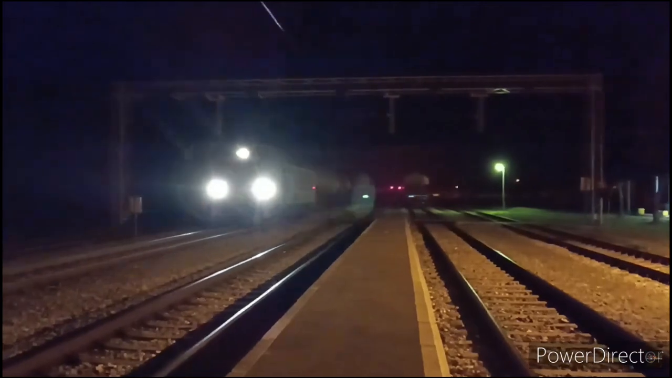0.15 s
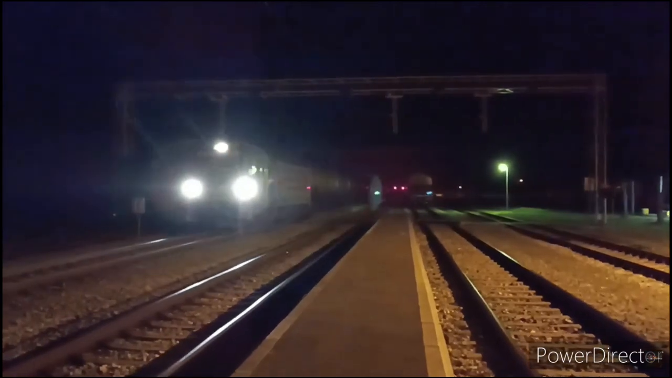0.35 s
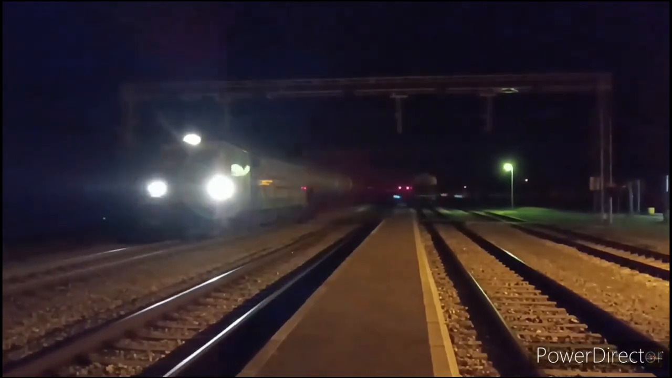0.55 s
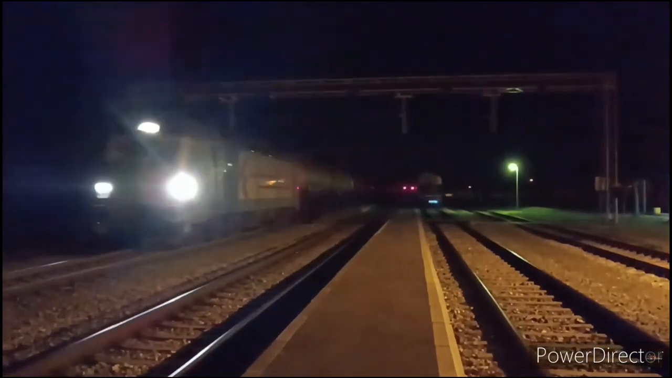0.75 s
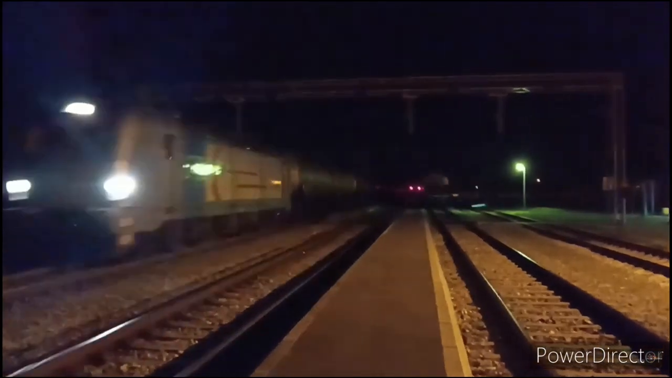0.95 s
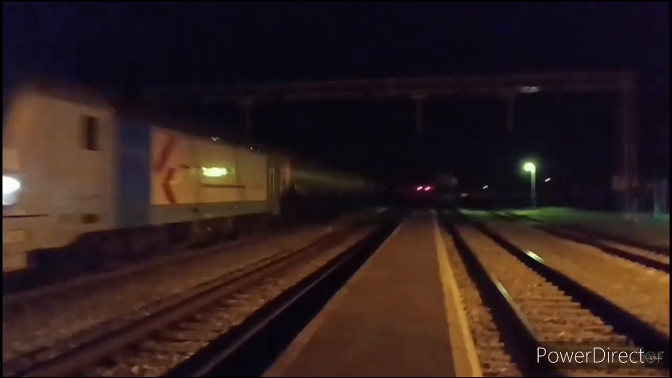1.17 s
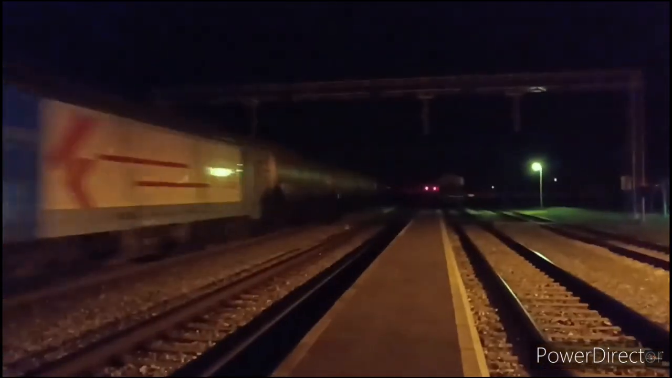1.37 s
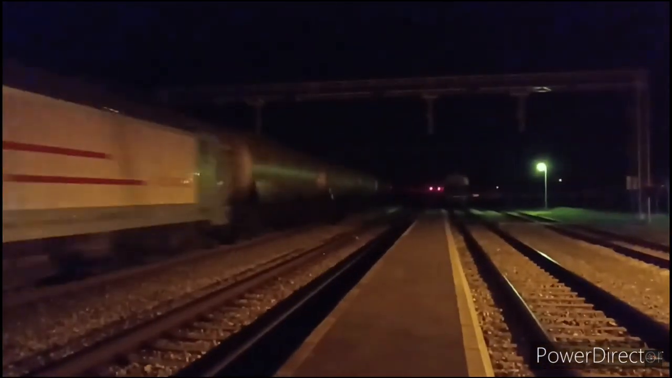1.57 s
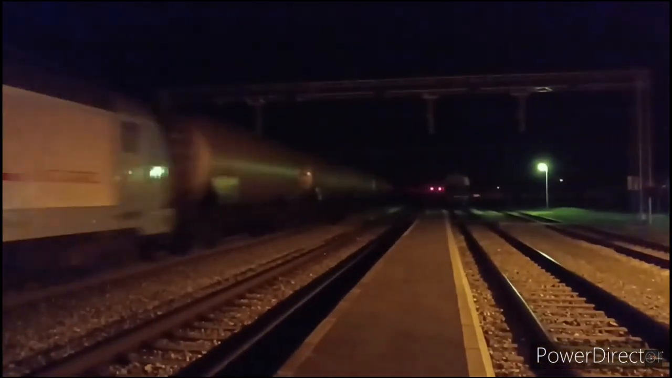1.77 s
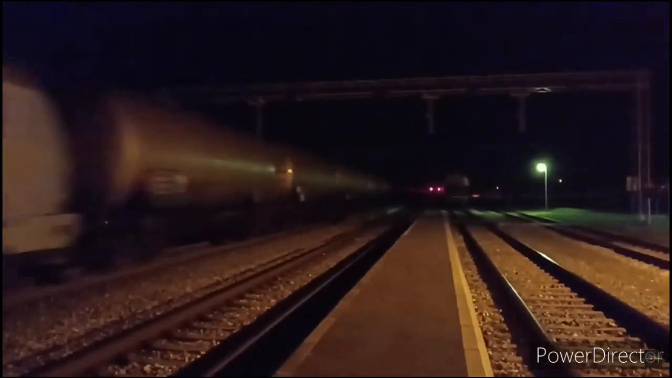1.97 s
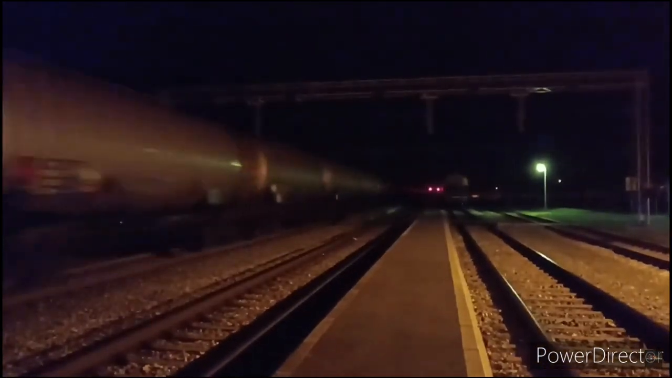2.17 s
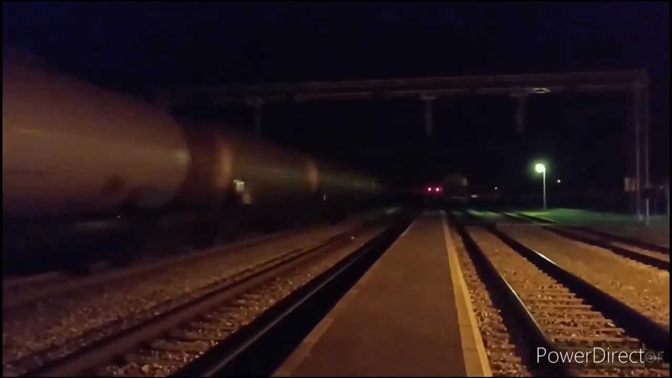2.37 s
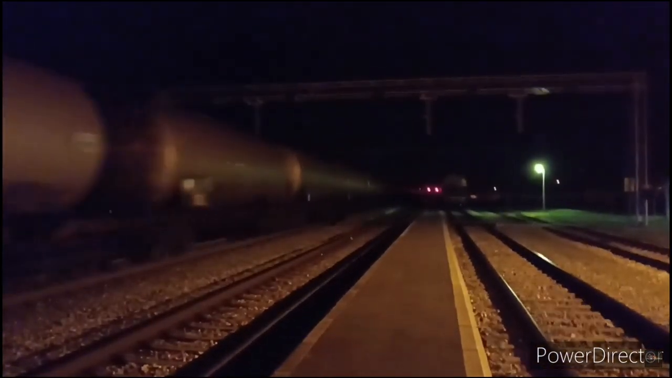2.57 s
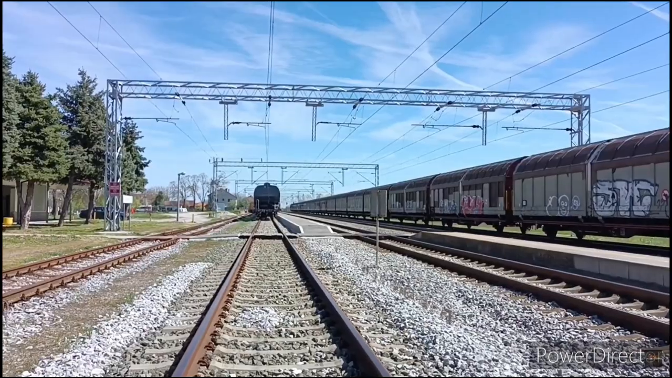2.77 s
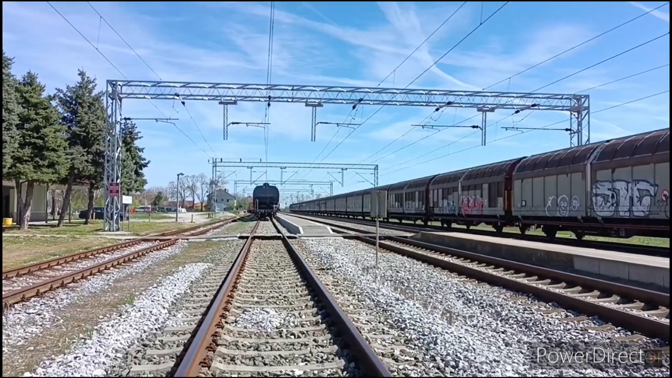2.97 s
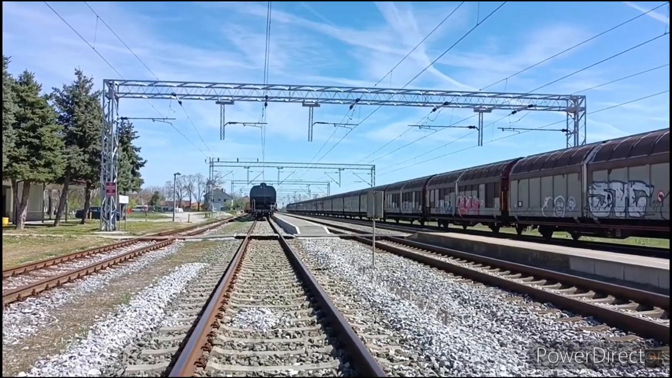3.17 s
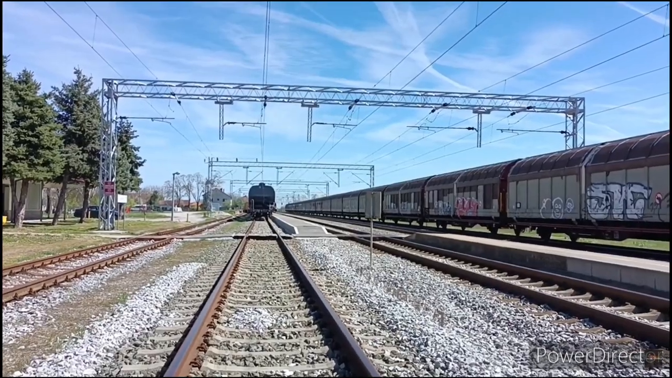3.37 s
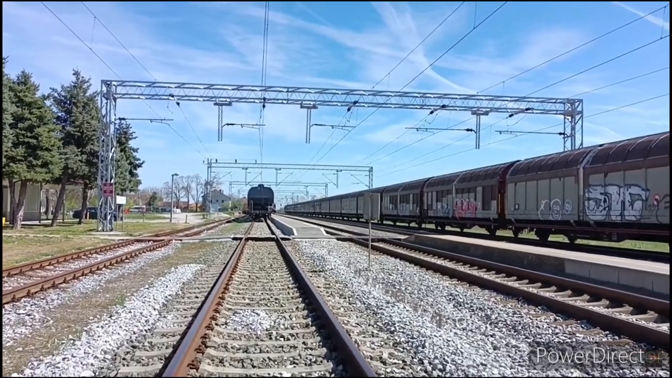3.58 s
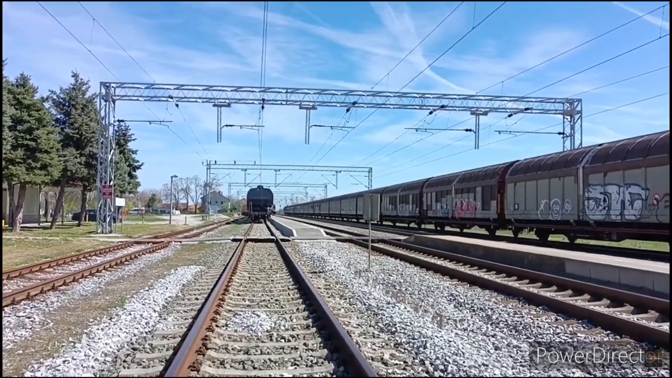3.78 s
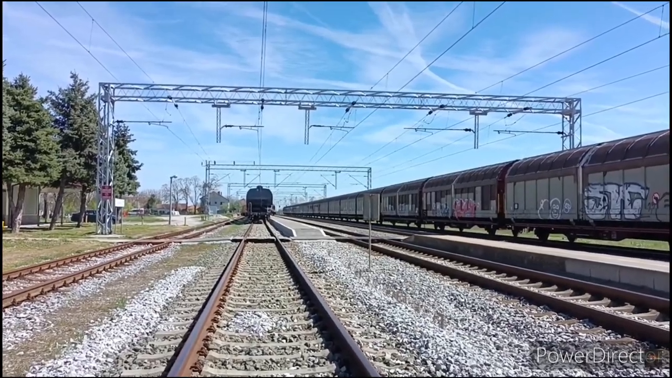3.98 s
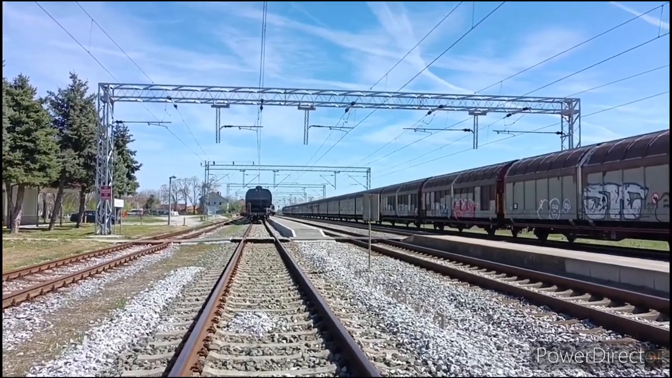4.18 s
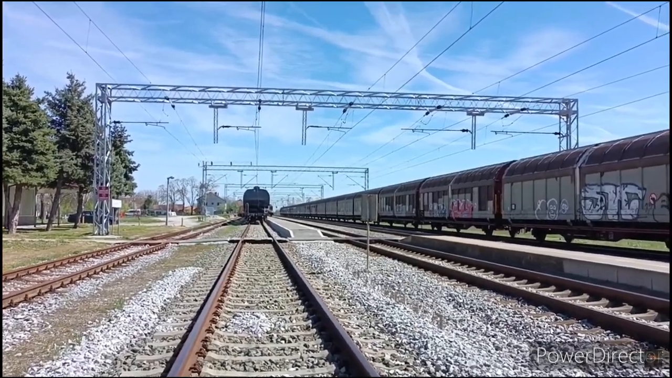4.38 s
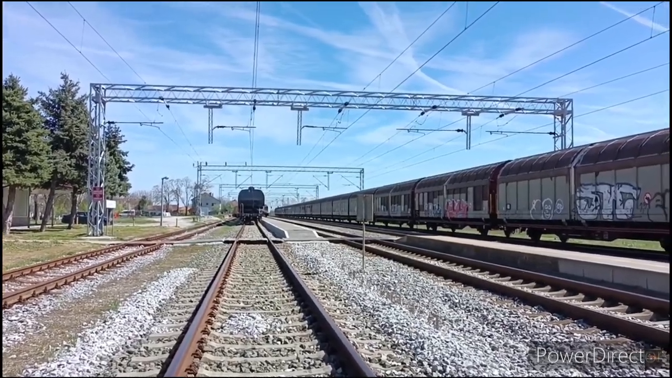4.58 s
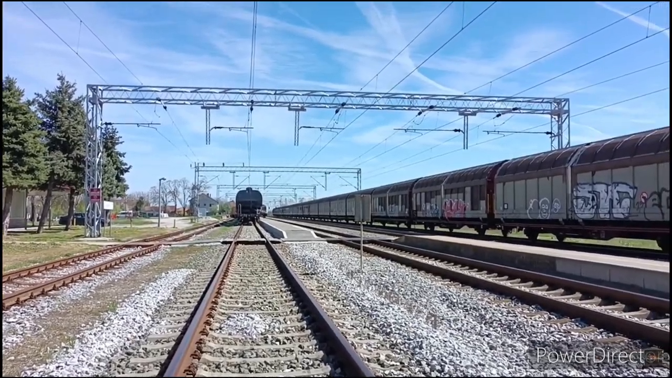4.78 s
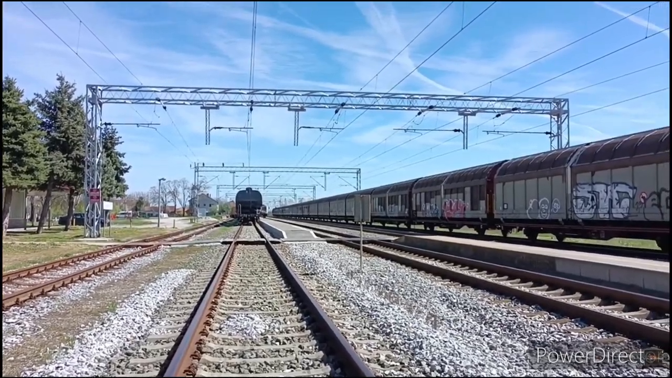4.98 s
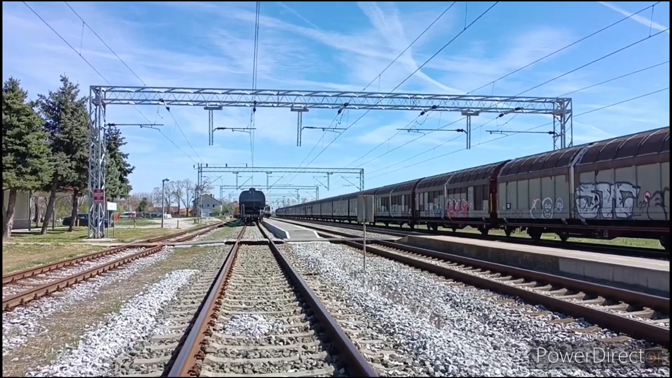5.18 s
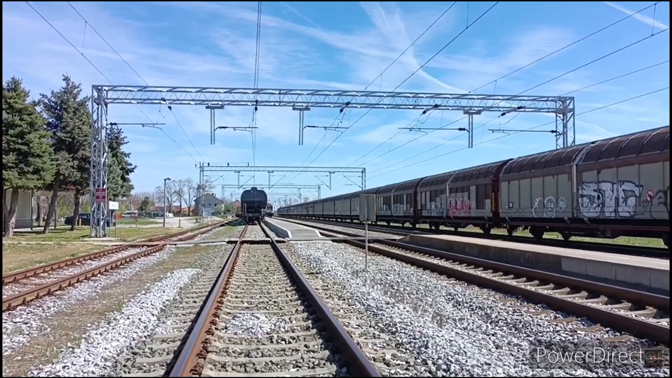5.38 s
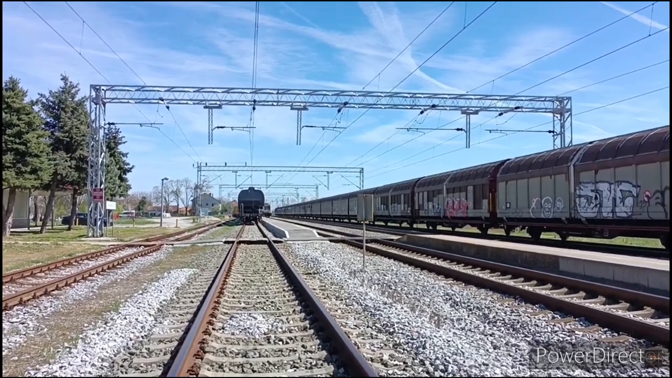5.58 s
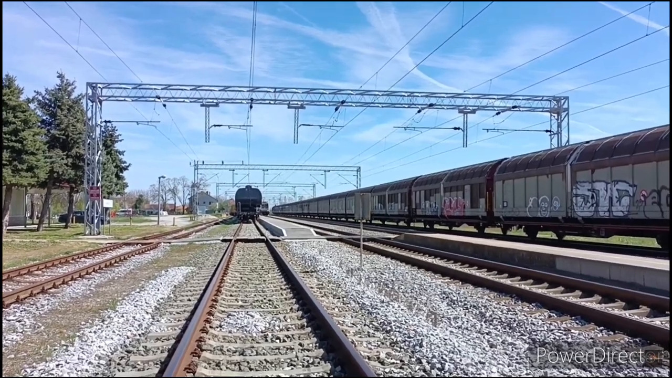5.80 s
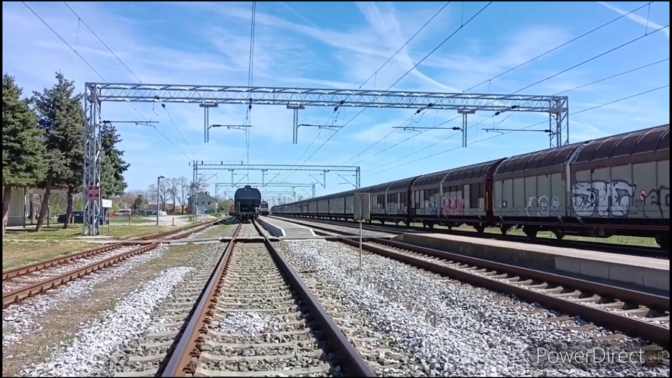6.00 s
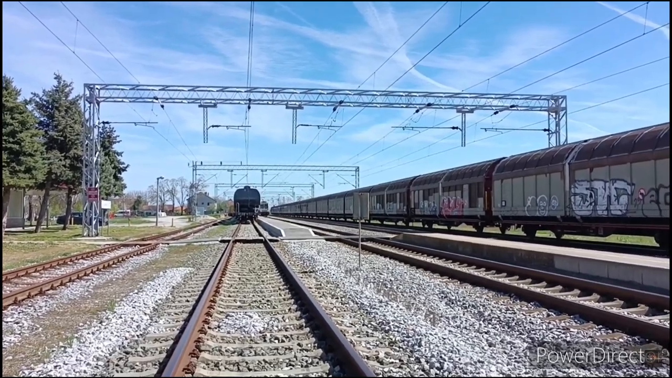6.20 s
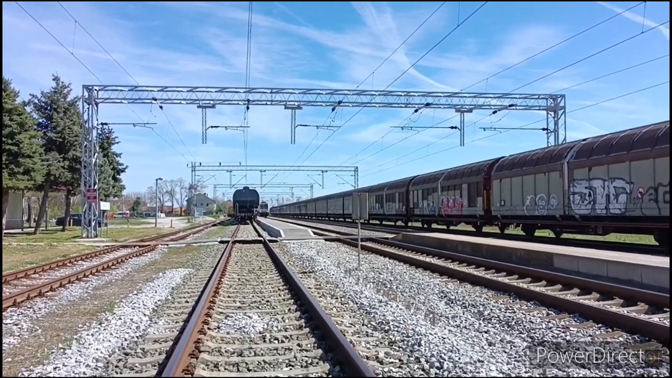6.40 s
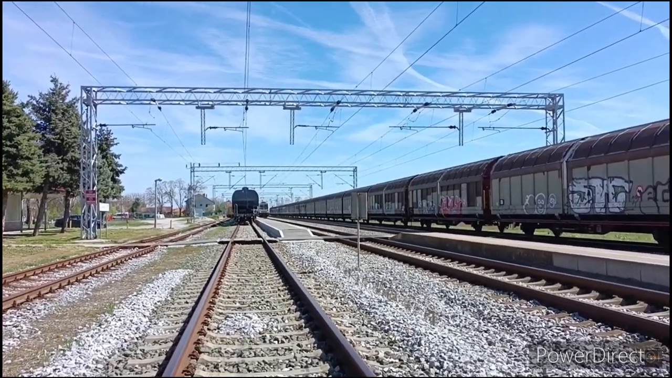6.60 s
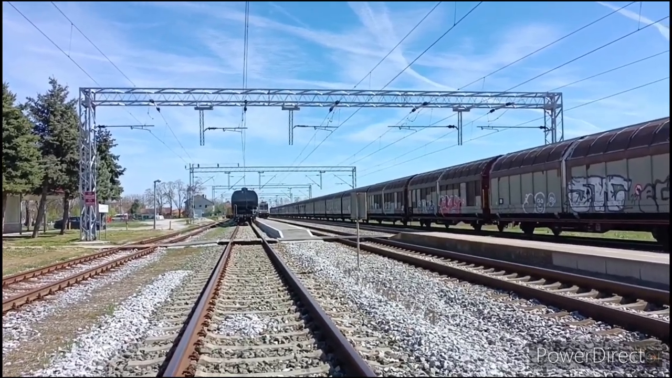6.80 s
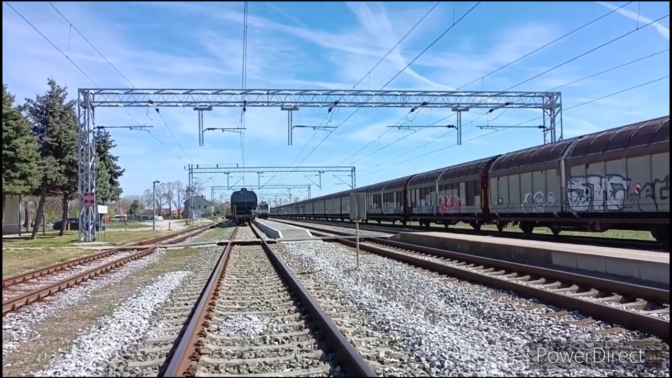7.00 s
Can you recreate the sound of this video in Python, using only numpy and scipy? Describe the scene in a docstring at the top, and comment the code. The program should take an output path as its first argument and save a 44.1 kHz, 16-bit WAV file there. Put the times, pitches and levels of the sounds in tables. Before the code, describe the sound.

Outdoor stereo pickup, first close to a passing night train: growing roar, metallic knocks, one loud brief two-note horn, then thick full rumble with couplings thudding and wheels ringing. A hard cut drops to a much quieter daytime rail yard, with soft air murmur, quick high bird whistles and small ballast crunches. After a calm pause, one brassy single-pitch horn sounds from afar, with a scattered outdoor echo.

```python
"""Railway by night and by day

At night a freight train rushes up to a platform, sounds one two-tone horn blast and rolls past rattling.
The scene then turns abruptly to the quiet track by day: birds twitter, ballast crunches softly, and a
distant locomotive gives one short single-tone blast that echoes along the standing wagons.
Rolling, air and contacts are filtered noise; horns are sums of harmonics; birds are gliding sine tones.
"""
import sys
import numpy as np
from scipy import signal
from scipy.fft import rfft, irfft, next_fast_len
from scipy.io import wavfile
from scipy.ndimage import uniform_filter1d, map_coordinates

SR = 44100
rng = np.random.default_rng(int(sys.argv[2]) if len(sys.argv) > 2 else 0)


def write(x):
    x = np.atleast_2d(x).T
    wavfile.write(sys.argv[1], SR, np.round(np.clip(x, -1, 1) * 32767).astype(np.int16))

N = 310905
TIME = np.arange(N) / SR
SIZE = next_fast_len(N + SR)
HZ = np.maximum(np.fft.rfftfreq(SIZE, 1 / SR), 1)
CHANGE_S = 2.67   # night ends, day begins
CUTOFF_HZ = 15450   # upper limit of the whole sound

# Correlation of the two ears' noise, train and open air: f/Hz, correlation (-1 to 1)
TRAIN_LIKENESS = [(130, 0.98), (290, 0.94), (640, 0.33), (1410, -0.48), (3100, 0.18), (7000, -0.1)]
AIR_LIKENESS = [(60, .55), (130, 0.77), (640, 0.64), (1410, -0.37), (3100, 0.26), (15000, -0.22)]
# Left-right balance of all coloured noise: f/Hz, left minus right/dB
BALANCE_DB = [(300, 0), (1200, -1.5), (2200, -3), (4200, -6.5), (8000, -7.5), (12000, 5.5)]

# Spectral density of the daytime air: f/Hz, relative level per Hz/dB
AIR = [(35, -16.5), (70, 1), (135, 0), (260, -7), (420, -10.5), (900, -12.5), (1250, 1), (1750, -14),
       (2800, -13.5), (4500, -26), (6300, -31.5), (8500, -47), (10500, -35), (12200, -23.5), (15000, -35)]
# Narrow bands raised in it: f/Hz, width/Hz, gain/dB
AIR_RING = [(1311, 67, 9), (5640, 120, 11), (7094, 490, 21), (9480, 150, 18)]
# Daytime air grows as the far locomotive nears; low, middle, high part:
# first level/dB, growth approached in the long run/dB
AIR_BANDS = [(-60.5, 2), (-59, 12.5), (-70.5, 9)]
AIR_GROWTH_S = 2.9   # time constant
# Soft narrow whirrs and hums by day: start t/s, end t/s, f/Hz, width/Hz, level/dB
WHIRRS = [(3.27, 3.65, 2250, 400, -54), (3.92, 4.1, 2120, 190, -58), (2.66, 4.355, 148, 49, -59.5),
          (4.5, 6.3, 1190, 160, -54.5)]

# Bird notes: t/s, length/s, mid-note f/Hz, glide/octaves, relative level/dB
BIRD = [(2.965, .06, 4780, 0, -61), (3.06, .05, 4280, .14, -67), (3.367, .064, 4850, 0.027, -55.5),
        (3.379, 0.047, 3440, -0.33, -50.5), (3.418, 0.053, 3400, -0.5, -55),
        (3.541, .045, 3700, -0.36, -58), (3.61, .03, 3450, -0.21, -54.5), (3.79, 0.065, 4760, -.1, -57),
        (3.85, .045, 4200, -0.19, -63), (4.078, .043, 4450, 0.14, -55.5), (4.116, .03, 3900, -.42, -53),
        (4.16, 0.027, 3550, .33, -57), (4.308, .073, 3810, 0.14, -60), (4.43, .06, 4760, 0, -64),
        (4.487, 0.061, 4100, 0.24, -66), (4.732, .056, 3610, -.29, -58.5), (4.834, 0.067, 4820, -.08, -53),
        (4.891, .05, 4130, -.3, -59.5), (6.732, .063, 4950, -0.012, -61)]
BIRD_ARCH_OCTAVES = 0.087   # both ends of a note lie below its middle

# Ballast shifts: t/s, grit level/dB, grit centre f/Hz, grit 60 dB decay/s, thud level/dB
CRUNCHES = [(2.811, -38, 3240, .033, -57), (2.844, -47, 2000, .06, -50.5), (3.075, -55, 2000, .06, -50),
            (3.112, -56, 1500, .03, -52), (3.515, -45, 2180, .07, -60), (3.697, -42, 2230, 0.1, -47),
            (3.722, -41.5, 2580, 0.055, -52), (3.787, -45, 2380, .07, -51), (3.954, -48, 2000, .025, -60),
            (5.075, -45, 1290, .025, -60)]
THUD_HZ, THUD_DECAY_S = 485, 0.077   # the bed of stones under each crunch
SPLINTER_HZ, SPLINTER_DB = 9000, -18   # bright edge, relative to the grit
# Soft low bumps: t/s, level/dB, centre f/Hz, 60 dB decay/s
BUMPS = [(3.69, -50, 260, 0.29), (4.79, -46, 110, 0.095), (5.2, -44, 58, .2)]

# Near high, near low and distant trumpet: start t/s, valve open/s, settled f/Hz, sag/(Hz/s), level/dB,
# swell/(dB/s), attack/s, release/(dB/s), release/s, rasp (0 to 1)
TRUMPETS = [(.93, 0.28, 400.5, 37, -14.5, 18.5, .042, 190, .12, .15),
            (.92, 0.306, 717.5, 50, -12.5, -1, .011, 115, .11, 0.62),
            (5.485, 0.296, 403.8, 4.97, -16, 7, .02, 101, 0.132, 0.99)]
# Every trumpet starts sharp (as a fraction of pitch) and settles, and dulls as its level falls
OVERSHOOT, SETTLE_S, DULLING_DB_PER_OCTAVE_PER_DB = .052, .036, 0.54
# As the valve shuts the diaphragm rasps: briefly flatter (fraction of pitch) and brighter, at full rasp
RASP_LAG_S, RASP_WIDTH_S, RASP_FLAT, RASP_DB_PER_OCTAVE = .012, .024, .012, 2.8
# Radiation of the horn bells: f/Hz, relative level/dB, left minus right/dB, left lead/rad
HIGH_BELL = [(394.4, -7.5, 2, 0.52), (790, -1, -1.5, 0.5), (1130, -9, 2.5, 1.4), (1640, -16.5, -7, 1.8),
             (1980, -21, -1.5, 1.7), (2400, -17, -6, 1), (3206, -16, -3, 2), (4300, -29, -12, 0.75),
             (6000, -19.5, -12, 1.7), (9080, -40, -10, 1.2), (15000, -45, -5, 2)]
LOW_BELL = [(710, -0.5, 0, 0.56), (1414, -5, -4, 1.86), (2130, -9, -1, 0.69), (2800, -11, -3.5, 2),
            (3590, -20, -1, 0.33), (5000, -22.5, -12, 0.67), (6400, -27.5, -12.5, 1), (9000, -46, 5, 1.7),
            (15000, -44.5, -3.5, 1)]
DAY_BELL = [(408, -11, 1, .2), (796, 2, 0, 1.23), (1210, -1, 2, 1.05), (1600, -9, -7, 0.4),
            (2020, -9.5, -18, 1.8), (2300, -8, -6, 0.72), (2820, -8, -1, 1.6), (3140, -12, -6.5, 2.2),
            (3850, -17, 0.5, 4), (4120, -26.5, -5, 2.2), (5800, -28, -7.5, 2.4), (7500, -46, -1, 1.5),
            (9500, -67, -5.5, 1), (12000, -92.5, -2.5, 1)]
# Extra colour while a bell speaks up, gone once it settles: f/Hz, gain/dB
HIGH_ONSET = [(400, -1), (800, -8.5), (1200, 5), (1600, -2), (2400, -7), (6000, -6)]
LOW_ONSET = [(730, 0.5), (1450, 7), (2170, -14.5), (2900, 10), (3600, 0.5), (6000, -3.5)]
DAY_ONSET = [(400, 3), (810, -1), (1220, -3), (1630, 10.5), (2030, 5.5), (2450, 6), (2850, -2), (3300, 0.5),
             (3700, 6), (4500, 11.5), (5700, -2)]

# The distant diaphragm squeaks before it speaks: f/Hz, level/dB
SQUEAK = [(738, -40), (1066, -30.5), (1534, -49), (4441, -44.5)]
# First gust through the distant bell: t/s, level/dB, centre f/Hz, 60 dB decay/s
LOW_PUFF = [(5.485, -39, 320, 0.088)]
# Echoes off wagons, trees and buildings: delay/s, mean level before flutter/dB, left minus right/dB
DAY_ECHOES = [(.075, -19, 7), (.19, -21, -4), (.29, -27.5, -8), (.44, -33.5, 2)]
# Faint tones that linger after the blast: f/Hz, mean peak amplitude/dB
LINGER = [(697, -50), (1044, -48.5), (1396, -53.5)]

# Spectral density of rolling noise, far and near: f/Hz, relative level per Hz/dB
FAR_ROLL = [(21, -52.5), (35, -26.5), (70, -5.5), (142, -1), (314, -5), (549, -7.5), (727, -6.5),
            (1450, -6.5), (1690, -5), (2230, -7.5), (5050, -26), (7030, -26.5), (9310, -38), (12000, -33.5),
            (15500, -46)]
NEAR_ROLL = [(21, -55), (35, -31.5), (65, -15), (154, -4.5), (437, -7), (484, -3.5), (536, -10), (785, -6),
             (1120, -10.5), (1450, -10), (1640, -10.5), (1970, -5.5), (3810, -16.5), (6350, -23),
             (15500, -44.5)]
# Resonances and hollows of wheels and track, far and near: f/Hz, width/Hz, gain/dB
FAR_RING = [(327.3, 27, 6.5), (442, 60, -5), (582, 64, -7.5), (720, 130, 2), (1150, 61, -4),
            (1430, 200, 3.5), (1702, 140, -9.5), (6840, 600, 2)]
NEAR_RING = [(506, 17, 3.5), (624, 90, 2), (1150, 110, -4), (1267, 26, 6.5), (1458, 71, 10),
             (1714, 170, -1.5), (1870, 400, 3), (2430, 200, 2.5)]
# Rumble, wheel roar, rail hiss: level when the train fills the whole angle/dB,
# share of the angle loss, dip under the horn/dB
ROLL_BANDS = [(-20.5, 1.19, 13), (-21, 0.96, 5), (-32.5, 1.25, 1)]
# The train is a long line of wheels whose front draws level with the platform
LEVEL_AT_S, SPEED_M_PER_S, TRACK_DISTANCE_M = 1.316, 17, 10.3
# The dip sets in with the horn's level and lets go slowly
DIP_FROM_DB, DIP_KNEE_DB, DIP_RELEASE_S = -25.5, 9, 0.12
# Wheels and couplings knock: t/s, level/dB, centre f/Hz, 60 dB decay/s
KNOCKS = [(.366, -23.5, 1880, .18), (.574, -18, 750, 0.2), (.737, -16, 2030, 0.094),
          (.768, -12.5, 1190, 0.094), (.876, -15.5, 1820, .16), (.88, -20, 230, 0.19),
          (.908, -13.5, 756, 0.075), (1.455, -16, 150, 0.091), (1.578, -10, 178, 0.097),
          (1.87, -15.5, 2030, 0.33), (1.91, -14, 170, 0.16), (2.42, -17, 199, .15), (2.27, -17, 370, 0.18),
          (2.61, -17, 317, 0.29)]
# Passing wheels sing briefly: start t/s, end t/s, f/Hz, width/Hz, level/dB
WHEEL_SONGS = [(1.593, 1.88, 1468, 48, -25), (2.13, 2.61, 479, 9, -27.5), (2.08, 2.34, 2000, 27, -28.5),
               (2.15, 2.4, 1960, 40, -27)]

# The near horn's rearward sound returns lower in pitch: delay/s, level before band-pass/dB
REAR_ECHOES = [(.06, -16.5), (.3, -18), (.52, -18)]
REAR_PITCH = .904   # frequency ratio
# The near horn's level dips briefly in mid-blast
FADE_S, FADE_WIDTH_S, FADE_DB = 1.057, 0.026, 3.5


def from_db(db):
    """Level: 20 dB is a factor of ten in amplitude."""
    return 10 ** (np.asarray(db) / 20)


def rms_one(x):
    """Normalisation: a signal divided by its rms has unit rms."""
    return x / np.sqrt(np.mean(x ** 2) + 1e-20)


def at_hz(points, hz):
    """Logarithmic frequency scale: each column is interpolated over log f."""
    known, *columns = np.transpose(points)
    return [np.interp(np.log(hz), np.log(known), c) for c in columns]


def panned(db):
    """Interaural level difference: half is added on the left and half taken on the right."""
    return from_db(np.array([[.5], [-.5]]) * db)


def drift(rate):
    """Band-limited fluctuation: a smooth curve through random knots, with unit rms."""
    knots = rng.standard_normal(4096)
    return rms_one(map_coordinates(knots, [TIME * 2 * rate], order=2, mode="wrap"))


def band(x, low_hz, high_hz):
    """Band-pass filtering by a Butterworth design."""
    sos = signal.butter(2, [low_hz, min(high_hz, .45 * SR)], "band", fs=SR, output="sos")
    return signal.sosfilt(sos, x)


def swell(start_s, end_s):
    """Envelope: the root of a half sine gives a rounded rise and fall."""
    progress = np.clip((TIME - start_s) / (end_s - start_s), 0, 1)
    return np.sqrt(np.abs(np.sin(np.pi * progress)))


def coloured(spectrum, rings, likeness):
    """Spectral shaping and interaural correlation: mixed mid and side noise, weighted over frequency."""
    db = at_hz(spectrum, HZ)[0]
    db = db + sum(gain_db * np.exp(-2 * ((HZ - hz) / width) ** 2) for hz, width, gain_db in rings)
    alike = np.clip(at_hz(likeness, HZ)[0], -1, 1)
    mid, side = rfft(rng.standard_normal((2, SIZE)))
    ears = np.sqrt(1 + alike) * mid + np.sqrt(1 - alike) * side * [[1], [-1]]
    return ears * from_db(db) * panned(at_hz(BALANCE_DB, HZ)[0])


def played(noise, levels_db, flutter_db, flutter_rate):
    """Amplitude modulation: three bands follow their levels and flutter partly together."""
    out, together = 0, drift(flutter_rate)
    edges = [15, 400, 3500, CUTOFF_HZ]
    for low, high, db in zip(edges, edges[1:], levels_db):
        part = irfft(noise * ((HZ >= low) & (HZ < high)), SIZE)[:, :N]
        unit = part / part.mean(axis=0).std()
        flutter = flutter_db * (together + drift(2 * flutter_rate))
        out = out + unit * from_db(db + flutter)
    return out


def narrow_swells(rows, apart_hz):
    """Narrow-band noise: bands rise and fall, alike in both ears at low pitch."""
    out = 0
    for start_s, end_s, hz, width_hz, db in rows:
        mid, side = band(rng.standard_normal((2, N)), hz - width_hz / 2, hz + width_hz / 2)
        ears = mid + min(hz / apart_hz, 1) * side * [[1], [-1]]
        out = out + rms_one(ears) * from_db(db) * swell(start_s, end_s)
    return out


def bursts(rows, spread, rise_s, apart_hz):
    """Damped resonance: contact noise decays exponentially, alike in both ears at low pitch."""
    out = np.zeros((2, N))
    for s, db, hz, t60 in rows:
        start = int(s * SR)
        t = TIME[:min(SR // 2, N - start)]
        noise = band(rng.standard_normal((2, SR)), hz / (1 + spread), hz * (1 + spread))
        mid, side = noise[:, -len(t):]   # the filter has settled by then
        ears = rms_one(mid + min(hz / apart_hz, 1) * side * [[1], [-1]])
        out[:, start:start + len(t)] += ears * from_db(db - 60 * t / t60) * (1 - np.exp(-t / rise_s))
    return out


def scatter(x, t60, build_s, low_hz, dull_hz):
    """Diffuse reverberation: countless small outdoor reflections build up and die away."""
    t = TIME[:2 * SR]
    response = band(rng.standard_normal((2, len(t))), low_hz, dull_hz)
    response = response * from_db(-60 * t / t60) * (1 - np.exp(-t / build_s))
    response *= np.sqrt(2 * dull_hz / SR / np.sum(response ** 2, axis=1, keepdims=True))
    return signal.fftconvolve(x, response, axes=1)[:, :N]


def escaping_air(tone, low_hz, high_hz):
    """Turbulence at the bell: noise follows the short-term rms of the tone."""
    pressure = np.sqrt(np.abs(uniform_filter1d(np.mean(tone ** 2, axis=0), size=200)))
    return pressure * rms_one(band(rng.standard_normal((2, N)), low_hz, high_hz))


def blast(row):
    """Transient excitation: one pull of the valve sets times, pitch, loudness and spectral tilt."""
    start_s, open_s, hz, sag, db, swell_db, attack_s, release_db, release_s, raspiness = row
    on = (TIME > start_s) & (TIME < start_s + open_s + release_s)
    t = TIME[on] - start_s
    fall_db = release_db * np.maximum(t - open_s, 0)
    rasp = raspiness * np.exp(-((t - open_s - RASP_LAG_S) / RASP_WIDTH_S) ** 2)
    gate = (1 - np.exp(-(t / attack_s) ** 2)) * np.clip((open_s + release_s - t) / 0.016, 0, 1)
    pitch = hz * (1 + OVERSHOOT * np.exp(-t / SETTLE_S) - RASP_FLAT * rasp) - sag * t
    loudness = gate * from_db(db + swell_db * np.minimum(t, open_s) - fall_db)
    tilt_db_per_octave = RASP_DB_PER_OCTAVE * rasp - DULLING_DB_PER_OCTAVE_PER_DB * fall_db
    return on, pitch, loudness, tilt_db_per_octave


def trumpet(row, bell, onset, settled_s, jitter, shimmer_db):
    """Harmonic series: a diaphragm chops the air; pitch sags and tone dulls as the pressure drops."""
    on, pitch, loudness, tilt = blast(row)
    phase = 2 * np.pi * np.cumsum(pitch * (1 + jitter * drift(160)[on])) / SR
    speaking_up = np.clip((settled_s - TIME[on]) / 0.064, 0, 1)
    middle_hz, tone, power = np.median(pitch), 0, 0
    for k in range(1, int(bell[-1][0] / middle_hz) + 1):
        level_db, pan_db, lead = at_hz(bell, k * middle_hz)
        level_db = level_db + speaking_up * at_hz(onset, k * middle_hz)[0] + tilt * np.log2(k)
        # shifting ground reflections make the short waves shimmer, differently in each ear
        knots = rng.standard_normal((2, 12))
        places = np.linspace(0, 11, len(pitch))
        shimmer = np.array([np.interp(places, np.arange(12), ear) for ear in knots])
        gain = from_db(level_db + shimmer_db * np.log(k) * shimmer) * rms_one(panned(pan_db))
        ear_phase = np.array([[.5], [-.5]]) * lead + rng.uniform(0, np.pi)
        tone = tone + gain * np.sin(k * phase + ear_phase)
        power = power + np.mean(gain ** 2, axis=0) / 2
    out = np.zeros((2, N))
    out[:, on] = tone / np.sqrt(power) * loudness
    return out


def day_air():
    """Ambient noise: open air and the far murmur of the locomotive grow slowly."""
    grown = 1 - np.exp(-np.maximum(TIME - CHANGE_S, 0) / AIR_GROWTH_S)
    levels_db = [db + growth_db * grown for db, growth_db in AIR_BANDS]
    return played(coloured(AIR, AIR_RING, AIR_LIKENESS), levels_db, flutter_db=0.7, flutter_rate=7)


def birds():
    """Frequency modulation: quick arched whistles warble, doubled and blurred by the trees."""
    song, quaver = np.zeros(N), drift(150)
    for s, length, middle_hz, glide, db in BIRD:
        u = np.linspace(0, 1, int(length * SR))
        note = slice(int(s * SR), int(s * SR) + len(u))
        hz = middle_hz * 2 ** (glide * (u - .5) - BIRD_ARCH_OCTAVES * (2 * u - 1) ** 2)
        warble = .04 * np.sin(2 * np.pi * rng.uniform(200, 350) * u * length)
        hz = hz * (1 + warble + .009 * quaver[note])
        song[note] += from_db(db) * np.sin(np.pi * u) * np.sin(2 * np.pi * np.cumsum(hz) / SR)
    doubled = song + from_db(-8) * np.roll(song, int(.024 * SR))
    song = doubled * panned(-5)
    blurred = scatter(song, t60=.7, build_s=.015, low_hz=1500, dull_hz=7000)
    return from_db(1.5) * song + from_db(-2.5) * blurred


def ballast():
    """Impact noise: each crunch is grit with a bright edge over a dull thud; low bumps are added."""
    contacts = list(BUMPS)
    for s, db, hz, t60, thud_db in CRUNCHES:
        grit = (s, db, hz, t60)
        splinter = (s, db + SPLINTER_DB, SPLINTER_HZ, t60)
        thud = (s, thud_db, THUD_HZ, THUD_DECAY_S)
        contacts += [grit, splinter, thud]
    return bursts(contacts, spread=0.39, rise_s=0.0013, apart_hz=2523)


def day_horn():
    """Direct and reflected sound: one far trumpet squeaks, puffs, blasts and echoes."""
    tone = trumpet(TRUMPETS[2], DAY_BELL, DAY_ONSET, settled_s=5.70, jitter=.0018, shimmer_db=1.3)
    tone = tone + from_db(-34) * escaping_air(tone, 700, 3200)
    squeak = sum(from_db(db) * np.sqrt(2) * np.sin(2 * np.pi * hz * TIME + 0.25 * drift(120))
                 for hz, db in SQUEAK)
    tone = tone + swell(5.456, 5.487) * squeak
    # air leaks past the diaphragm, then puffs it open
    leak, puff = (5.457, -50, 3500, 0.27), (5.49, -28, 985, 0.13)
    tone = tone + band(bursts([leak, puff], spread=1.6, rise_s=0.002, apart_hz=1500), 120, 7000)
    tone = tone + bursts(LOW_PUFF, spread=.4, rise_s=.002, apart_hz=2000)
    dull = band(tone, 300, 4200)
    echoes = sum(np.pad(dull, ((0, 0), (int(s * SR), 0)))[:, :N] * from_db(db) * panned(pan_db)
                 for s, db, pan_db in DAY_ECHOES)
    echoes = echoes + from_db(-11.5) * scatter(tone, t60=1.2, build_s=.04, low_hz=950, dull_hz=4800)
    # moving air makes the long paths flutter
    echoes = echoes * from_db(2.5 * np.array([drift(20), drift(20)]))
    linger = sum(from_db(db + 3.5 * drift(6)) * np.sin(2 * np.pi * hz * TIME + .8 * drift(14))
                 for hz, db in LINGER)
    return tone + echoes + swell(5.55, 6.55) ** 2 * linger


def dip_under(horn):
    """Envelope following: 0 to 1, rises at once when the horn is loud and recovers slowly."""
    horn_power = np.abs(uniform_filter1d(np.mean(horn ** 2, axis=0), size=600))
    excess = (10 * np.log10(horn_power + 1e-12) - DIP_FROM_DB) / DIP_KNEE_DB
    recovery = TIME / DIP_RELEASE_S
    return np.clip(np.maximum.accumulate(excess + recovery) - recovery, 0, 1)


def wagons(dip):
    """Line source: rolling noise grows with the angle the train fills; wheels and couplings knock."""
    filled = .5 + np.arctan(SPEED_M_PER_S * (TIME - LEVEL_AT_S) / TRACK_DISTANCE_M) / np.pi
    angle_db = 10 * np.log10(filled)
    levels_db = [db + share * angle_db - dip_db * dip for db, share, dip_db in ROLL_BANDS]
    far_noise = coloured(FAR_ROLL, FAR_RING, TRAIN_LIKENESS)
    near_noise = coloured(NEAR_ROLL, NEAR_RING, TRAIN_LIKENESS)
    far_roll = played(far_noise, levels_db, flutter_db=1.19, flutter_rate=12)
    near_roll = played(near_noise, levels_db, flutter_db=0.75, flutter_rate=14)
    near = np.clip((TIME - 1.0) / .5, 0, 1)   # colour changes as the train draws level
    rolling = np.sqrt(1 - near) * far_roll + np.sqrt(near) * near_roll
    return rolling + bursts(KNOCKS, spread=0.23, rise_s=0.0027, apart_hz=1300)


def night_horn():
    """Superposition and Doppler shift: two rough trumpets sound together, with air and rear echoes."""
    high = trumpet(TRUMPETS[0], HIGH_BELL, HIGH_ONSET, settled_s=1.09, jitter=.009, shimmer_db=1.0)
    low = trumpet(TRUMPETS[1], LOW_BELL, LOW_ONSET, settled_s=1.07, jitter=.0065, shimmer_db=1.2)
    tone = (high + low) * from_db(-FADE_DB * np.exp(-((TIME - FADE_S) / FADE_WIDTH_S) ** 2))
    air = from_db(-18.5) * escaping_air(tone, 1900, 6800)
    air = air + from_db(-24.0) * escaping_air(tone, 5000, 16000)
    # the locomotive runs away from whatever stands behind it, so those echoes are stretched and dull
    start_s, rear = TRUMPETS[1][0], 0
    for delay_s, db in REAR_ECHOES:
        heard_s = start_s + (TIME - start_s - delay_s) * REAR_PITCH
        rear = rear + from_db(db) * np.array([np.interp(heard_s, TIME, ear) for ear in tone])
    scattered = from_db(-7.5) * scatter(tone, t60=1.2, build_s=0.028, low_hz=1000, dull_hz=4500)
    return tone + air + band(rear, 450, 2600) + scattered


def scene():
    """Superposition of sources: the night pass, then the track by day."""
    day = day_air() + narrow_swells(WHIRRS, apart_hz=1000) + birds() + ballast() + day_horn()
    horn = night_horn()
    night = wagons(dip_under(horn)) + narrow_swells(WHEEL_SONGS, apart_hz=1300) + horn
    return np.where(TIME < CHANGE_S, night, day)


def record(dry):
    """Peak clipping and low-pass filtering: the highest peaks are held in, the top is cut."""
    held = np.clip(dry, -.9, .9)
    return signal.sosfilt(signal.ellip(12, .1, 90, CUTOFF_HZ, fs=SR, output="sos"), held)


dry = scene()
out = record(dry)
write(out)
```